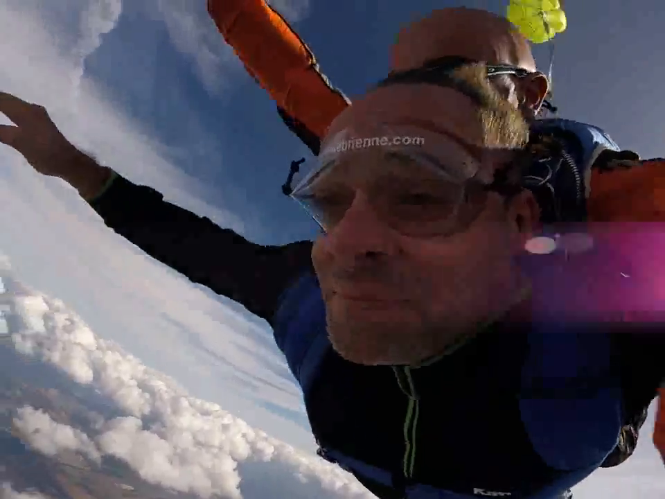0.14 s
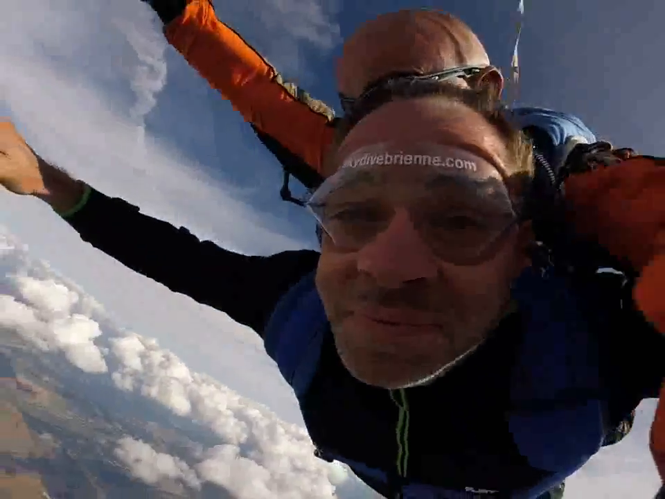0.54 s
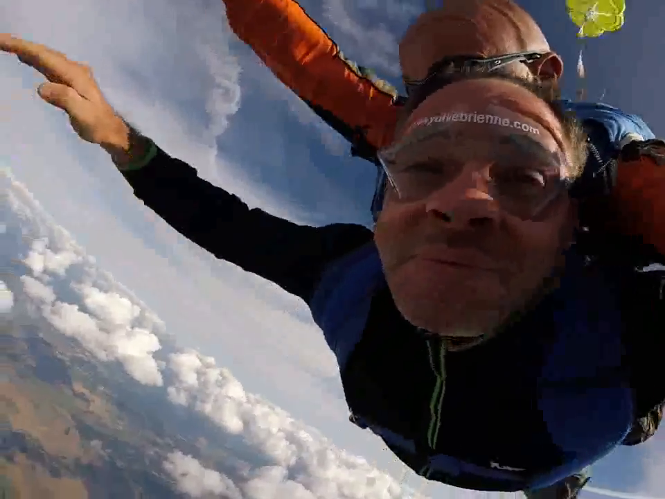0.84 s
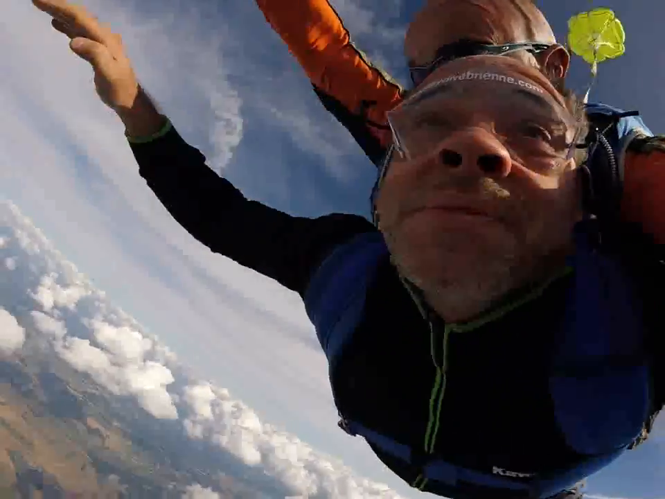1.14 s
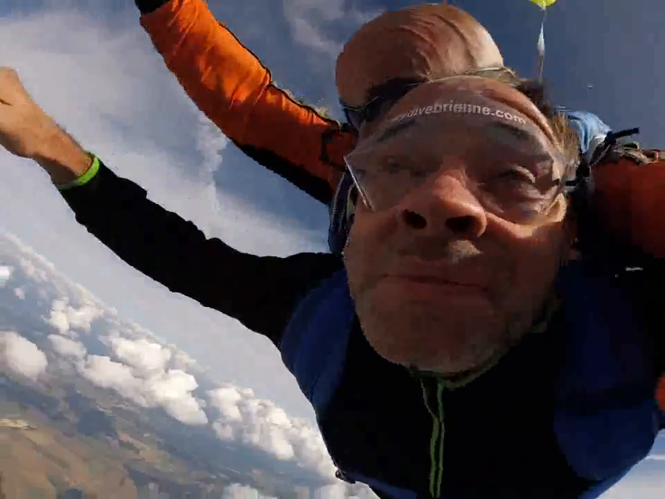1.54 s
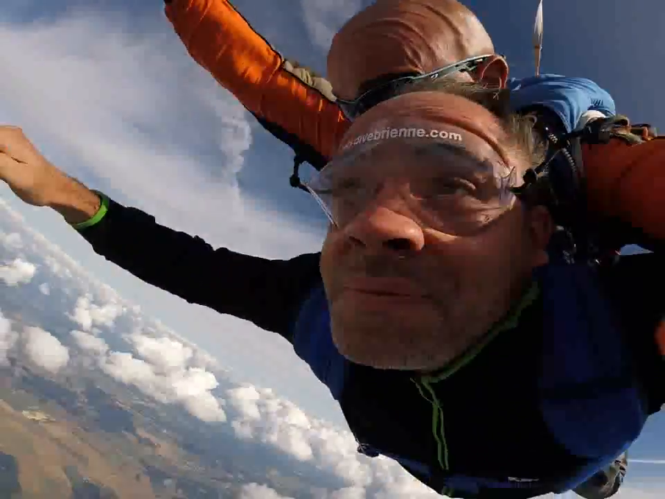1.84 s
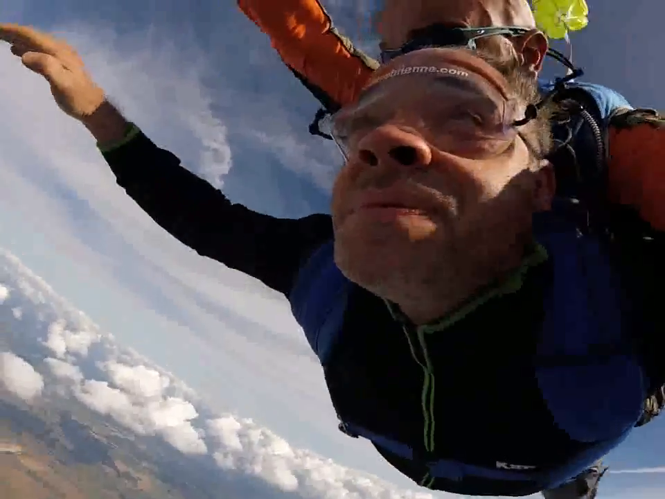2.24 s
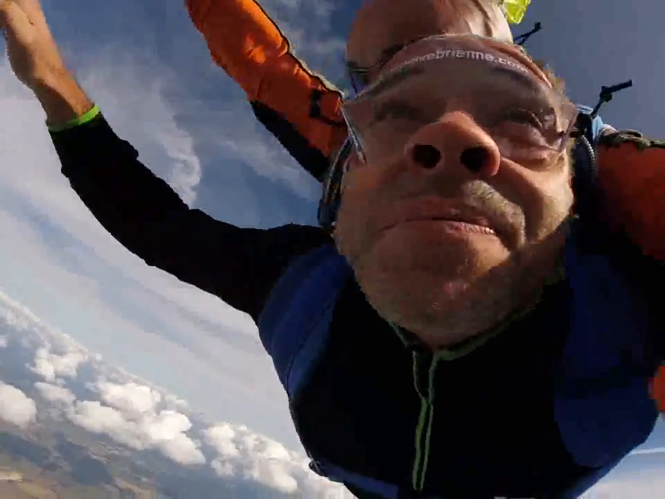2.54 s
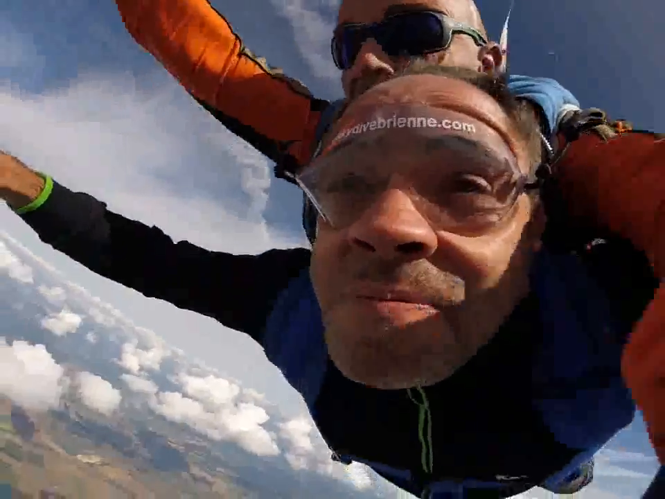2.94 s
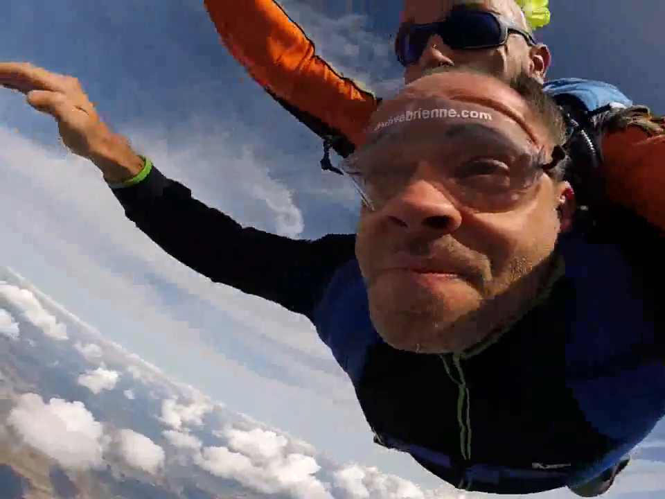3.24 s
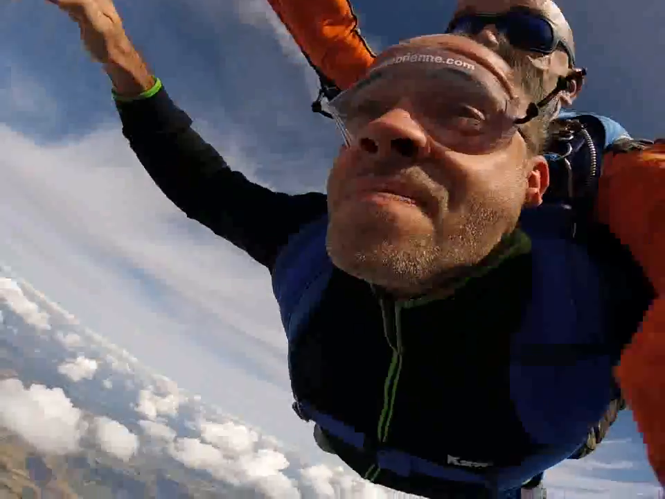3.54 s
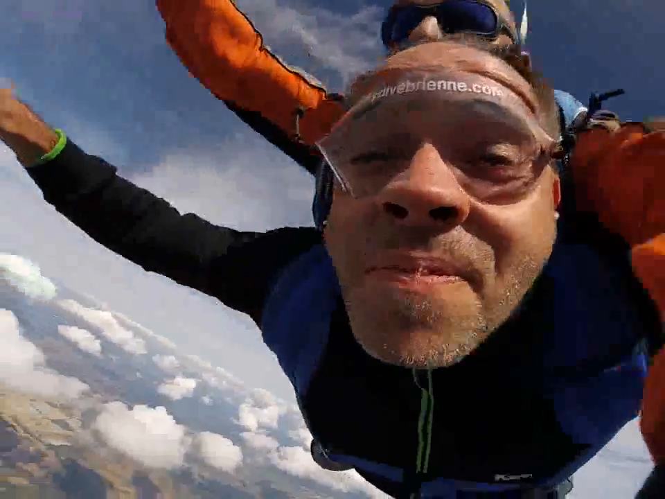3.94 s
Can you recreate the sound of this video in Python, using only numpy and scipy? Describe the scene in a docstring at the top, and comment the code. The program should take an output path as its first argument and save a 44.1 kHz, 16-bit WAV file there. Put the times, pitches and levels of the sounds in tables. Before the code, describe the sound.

A loud, unbroken rush of air pounds a close microphone during a fall through open sky. Deep buffeting and a churning, hollow drone form the base, while gusts whoosh slightly upward in pitch and a bright hiss briefly sinks and returns. Clothing flutters in the stream throughout, with many tiny snaps and a few sharper ones, mostly past the middle.

```python
"""A dense, thumping rush of wind: freefall, heard from a camera held out on a skydiver's wrist.
Air buffets the microphone, drones as it sheds eddies off the housing, roars past, whooshes in gusts
and hisses in the port; the hiss swells and sinks as the arm turns in the stream.
Flapping cloth adds small snaps, and the camera's limiter holds the peaks."""
import sys
import numpy as np
from scipy.fft import rfft, irfft, next_fast_len
from scipy.io import wavfile
from scipy.ndimage import uniform_filter1d, minimum_filter1d, map_coordinates

SR = 44100
rng = np.random.default_rng(int(sys.argv[2]) if len(sys.argv) > 2 else 0)


def wav_record(signal):
    """Record a signal, one row per channel, as 16-bit PCM in the file named by sys.argv[1]."""
    frames = np.transpose(np.atleast_2d(signal))
    bounded = np.clip(frames, -1, 1)
    # unit amplitude maps onto the largest positive 16-bit level
    quanta = np.round(bounded * 32767).astype(np.int16)
    wavfile.write(sys.argv[1], SR, quanta)


N = 180280


def buffeting():
    """Big lumps of wake air thump the diaphragm; smaller ones churn above them in the low mids."""
    # tone of the thumps and of the churn: (frequency [Hz], relative level [dB])
    buffet_spectrum = [(10, -19), (25, -2), (48, -0.5), (67, 5), (85, -1), (110, 2), (170, -9), (400, -64)]
    churn_spectrum = [(60, -27), (110, -11), (155, 2), (205, -2.5), (280, 1), (600, -53)]
    # the wake's pressure on the microphone, as a fader ride for each: (time [s], level [dB])
    buffet_ride = [(0, -17.5), (.72, -14.5), (.9, -20.5), (1.36, -14), (1.6, -19), (2.7, -18), (3.1, -16),
                   (3.6, -16), (3.72, -17.5), (4.08, -15)]
    churn_ride = [(0, -15), (.38, -15), (.5, -21.5), (.9, -21), (1.04, -13), (1.45, -19), (1.7, -14),
                  (2.02, -18.5), (2.2, -15), (2.78, -13.5), (2.95, -18.5), (4.08, -15)]
    buffet = amp(curve(buffet_ride)) * steady(noise(buffet_spectrum), span_s=0.093)
    churn = amp(curve(churn_ride)) * steady(noise(churn_spectrum), span_s=0.13)
    return buffet + churn


def shedding(rate_hz, wander_hz, rest_db, attack_s, fade_db_per_s):
    """Eddies leave the housing at a loose rate: a hollow, fluttering drone that swells, holds and fades."""
    # spells in which the eddies lock on to the housing: (start [s], hold [s], level [dB])
    spells = [(-.6, 0.33, -14.5), (0.185, 0.28, -13), (1.296, 0.51, -13.5), (2.383, 0.55, -14.5),
              (3.664, .4, -13)]
    t = np.arange(N) / SR
    level = np.full(N, amp(rest_db))
    for start, hold, db in spells:
        attack = np.clip((t - start) / attack_s, 0, 1)
        fading_s = np.maximum(0, t - start - attack_s - hold)
        level = np.maximum(level, attack * amp(db - fade_db_per_s * fading_s))
    drone = band(rate_hz + wander_hz * wobble(5), half_width_hz=52.2)
    return level * steady(drone, span_s=0.056)


def rush(stream_db, waver_db, flutter_db, grain_db, tearing, port_follow, port_db):
    """Passing air roars and hisses in ragged bursts; the weaker the hiss, the more it tears into spits."""
    # tone of the midrange roar and of the bright hiss: (frequency [Hz], relative level [dB])
    roar_spectrum = [(200, -42), (400, 0), (500, 1), (640, -1), (800, -0.6), (1100, -5), (1500, -8.5),
                     (2000, -21), (3000, -33), (6000, -63)]
    hiss_spectrum = [(600, -12), (1300, 9), (1900, 9), (2800, 2), (4200, -8), (5800, -11.5), (6500, -7),
                     (8200, -15.5), (10400, -20), (11900, -39.5), (13500, -34.5), (15000, -44)]
    # fader ride of the roar: (time [s], level [dB])
    roar_ride = [(0, -16), (.25, -17), (.82, -21), (1, -16.5), (2.4, -17.5), (3.6, -18), (4.08, -19)]
    hiss_db = stream_db - shelter() + waver_db * wobble(20)
    swell_db = hiss_db - hiss_db.mean()
    ragged_db = flutter_db * wobble(55) + grain_db * wobble(650)
    bursts = steady(amp(ragged_db * np.exp(-tearing * swell_db)), span_s=0.48)
    roar = amp(curve(roar_ride)) * unit(noise(roar_spectrum) * bursts ** 0.59)
    hiss = amp(hiss_db) * unit(noise(hiss_spectrum) * bursts)
    grazing_air = noise([(2500, -27), (5200, 7.0), (6000, -1.0), (9000, -20)]) * bursts
    # the cavity keeps ringing even when the stream grazes it less
    ring = amp(port_db + port_follow * swell_db) * unit(port(grazing_air))
    return roar + hiss + ring


def shelter(squareness=2.4):
    """The dB taken off the hiss as the microphone turns out of the stream; squareness 2 gives bell dips."""
    # lulls in the hiss: (middle [s], length [s], depth [dB])
    lulls = [(0.114, 0.12, 4.5), (1.05, 0.3, 7.5), (1.523, 0.24, 2.5), (2.034, .23, 7), (2.246, 0.22, 6),
             (2.554, 0.11, 3), (3.115, 0.12, 8), (3.216, .07, 4.5), (3.584, .09, 8.5), (3.906, 0.16, 2.5)]
    t = np.arange(N) / SR
    return sum(db * np.exp(-np.abs(2 * (t - middle) / length) ** squareness)
               for middle, length, db in lulls)


def port(x):
    """x ringing in the air cavity behind the microphone hole."""
    # cavity resonances: (frequency [Hz], width [Hz], gain [dB])
    modes = [(5050, 670, -0.5), (5550, 650, 4)]
    return filtered(x, lambda f: sum(amp(db) * 1j * f * width / (hz * hz - f * f + 1j * f * width)
                                     for hz, width, db in modes))


def whooshes(start_hz, sweep_hz_per_s, rise_s):
    """Each gust round the housing swells and fades at its own pace while its hollow whoosh sweeps up."""
    # gusts: (start [s], fade [s], peak level [dB])
    gusts = [(-.17, 1.6, -22.5), (1, .17, -18), (1.529, 0.18, -24.5), (2.1, 0.96, -21), (3.13, .9, -19.5)]
    t = np.arange(N) / SR
    air = np.zeros(N)
    for start, fade, db in gusts:
        age = np.clip(t - start, 0, rise_s + fade)
        swell = np.interp(age, [0, rise_s, rise_s + fade], [0, 1, 0])
        air += amp(db) * swell * band(start_hz + sweep_hz_per_s * age, half_width_hz=156)
    return air


def cloth(snaps_per_s, small_db, scatter_db, decay_s):
    """Sleeves and straps crack in the stream: a few sharp snaps among many small ones."""
    # the sharpest snaps: (time [s], level [dB])
    sharp_snaps = [(0.965, -19), (2.029, -25), (2.102, -24), (2.121, -24), (2.43, -16), (2.6545, -17),
                   (3.275, -19)]
    when, softness = rng.random((int(snaps_per_s * N / SR), 2)).T
    small_snaps = zip(when * N / SR, small_db - scatter_db * softness)
    t = np.arange(SR // 100) / SR
    envelope = np.zeros(N + 2 * len(t))
    for start, db in [*sharp_snaps, *small_snaps]:
        envelope[int(start * SR):][:len(t)] += amp(db) * np.exp(-t / decay_s)
    crack = noise([(400, -11), (1500, 24.5), (4000, -31), (5400, 9),
                   (7500, 4), (10400, -20), (12000, -30)])
    return envelope[:N] * crack


def amp(db):
    """Decibels to gain."""
    return 10 ** (np.asarray(db) / 20)


def unit(x):
    """x at rms 1."""
    return x / np.sqrt(np.mean(x ** 2) + 1e-20)


def curve(points):
    """Straight lines through (time [s], value) points, one value per sample."""
    times, values = np.transpose(points)
    return np.interp(np.arange(N) / SR, times, values)


def wobble(rate):
    """A smooth random curve of rms 1, rate knots a second."""
    knots = rng.standard_normal(int(N * rate / SR) + 4)
    return unit(map_coordinates(knots, [np.arange(N) * rate / SR]))


def filtered(x, response):
    """x through a filter whose gain is response(frequency [Hz])."""
    size = next_fast_len(N + 8192)
    return irfft(rfft(x, size) * response(np.fft.rfftfreq(size, 1 / SR)), size)[:N]


def coloured(x, spectrum):
    """x equalised by (frequency [Hz], gain [dB]) points on a log axis, silent above the last one."""
    hz, db = np.transpose(spectrum)
    return filtered(x, lambda f: amp(np.interp(np.log(f + 1), np.log(hz), db, right=-np.inf)))


def noise(spectrum):
    """Coloured noise of rms 1."""
    return unit(coloured(rng.standard_normal(N), spectrum))


def band(centre_hz, half_width_hz):
    """Narrow noise around a moving centre."""
    spread = [(1, 0), (half_width_hz, -1), (2 * half_width_hz, -5.5), (4 * half_width_hz, -24)]
    phase = 2 * np.pi * np.cumsum(centre_hz) / SR
    return noise(spread) * np.cos(phase) + noise(spread) * np.sin(phase)


def steady(x, span_s):
    """x with its swells slower than span_s evened out: a stream of constant force."""
    power = np.abs(uniform_filter1d(x ** 2, int(span_s * SR) + 1))
    return x / np.sqrt(power + 1e-9)


def limited(x, ceiling_db, hold_s):
    """The gain ducks around each peak that would pass the ceiling."""
    size = int(hold_s * SR) + 1
    needed_gain = np.minimum(1, amp(ceiling_db) / (np.abs(x) + 1e-9))
    return x * uniform_filter1d(minimum_filter1d(needed_gain, size), size)


def scene():
    """Wind and cloth, mixed at the one microphone."""
    air = buffeting()
    air += shedding(rate_hz=302.3, wander_hz=3.98, rest_db=-19, attack_s=0.092, fade_db_per_s=14)
    air += whooshes(start_hz=851.6, sweep_hz_per_s=380, rise_s=0.28)
    air += rush(stream_db=-24.5, waver_db=0.47, flutter_db=0.99, grain_db=2.0,
                tearing=0.079, port_follow=0.53, port_db=-37.5)
    snaps = cloth(snaps_per_s=44, small_db=-24.5, scatter_db=4, decay_s=0.0015)
    dulled_snaps = coloured(snaps, [(9000, -0.5), (14000, -24)])  # the housing softens their top
    return (air + dulled_snaps)[None]


def record(dry):
    """The camera limits the peaks and cuts everything above 15 kHz."""
    held = limited(dry[0], ceiling_db=-0.5, hold_s=0.004)
    return filtered(held, lambda f: f < 15000)[None]


dry = scene()
out = record(dry)
wav_record(out)
```